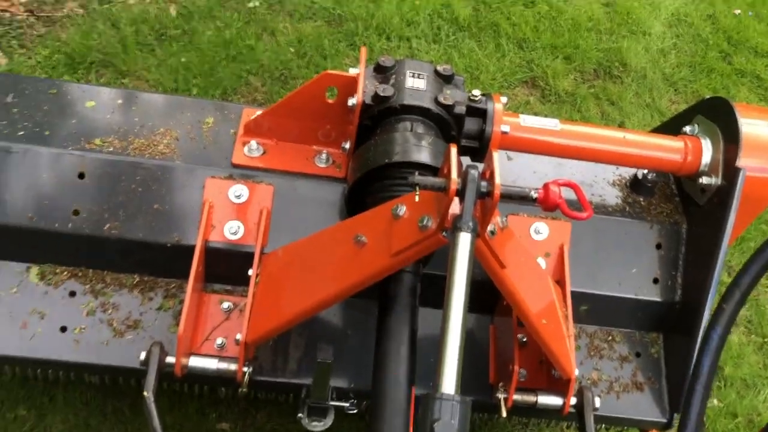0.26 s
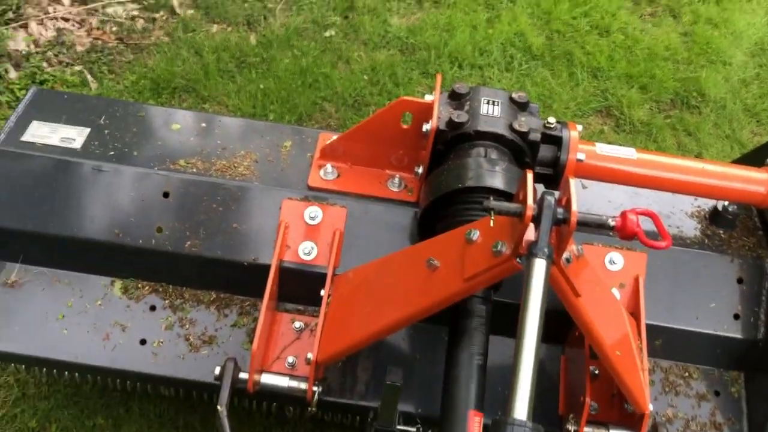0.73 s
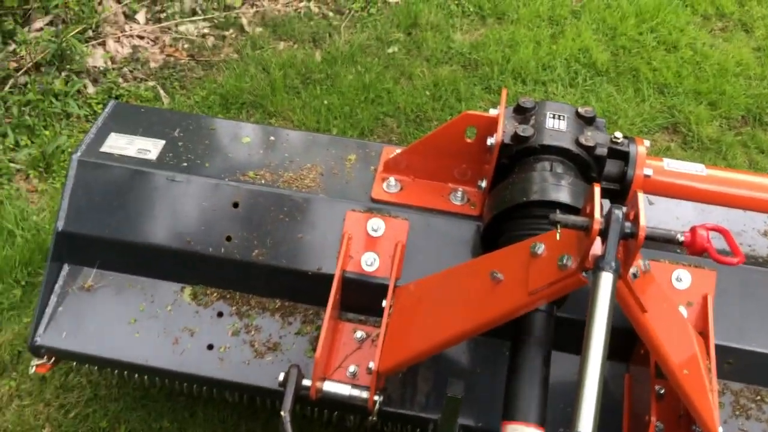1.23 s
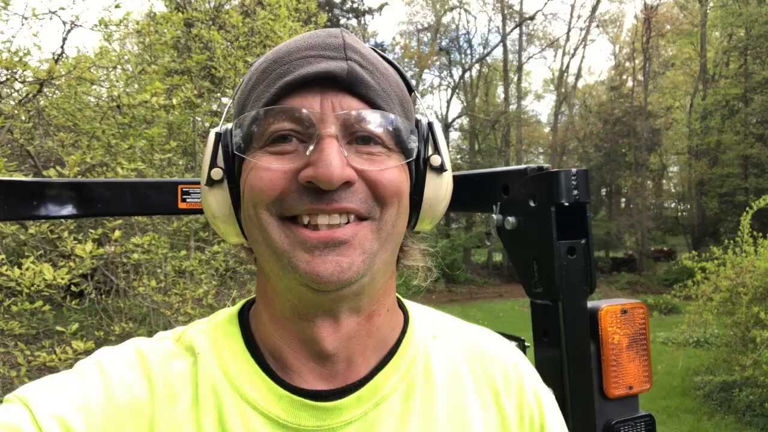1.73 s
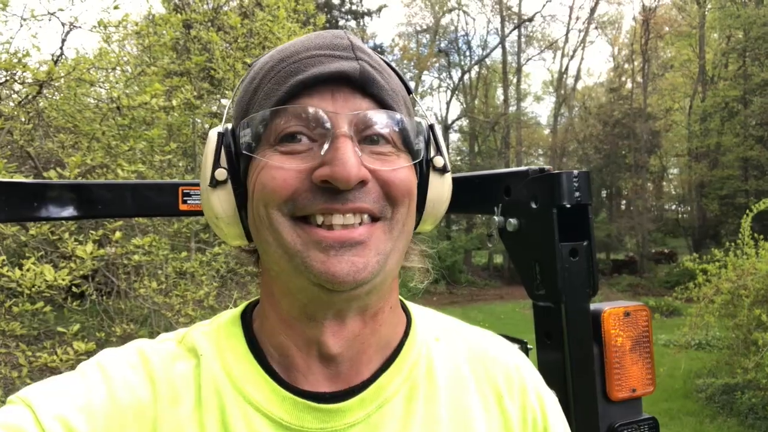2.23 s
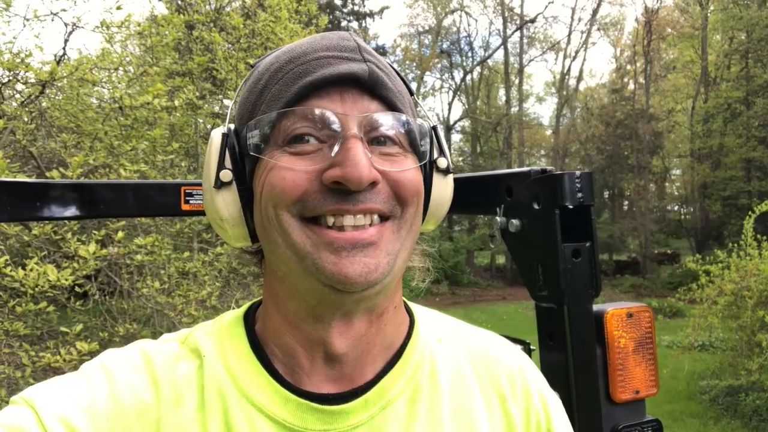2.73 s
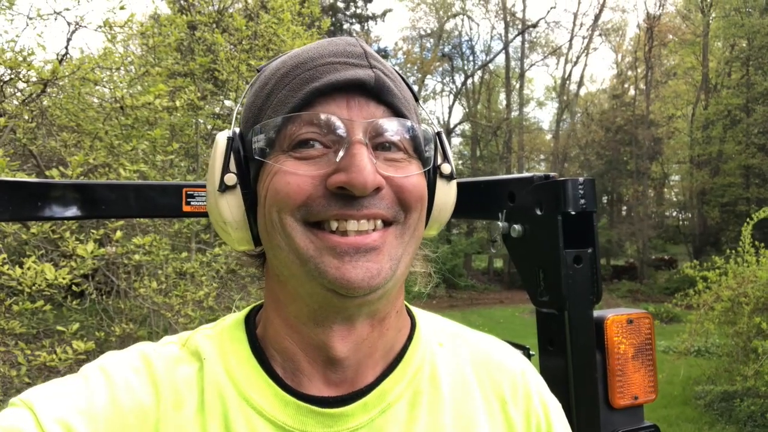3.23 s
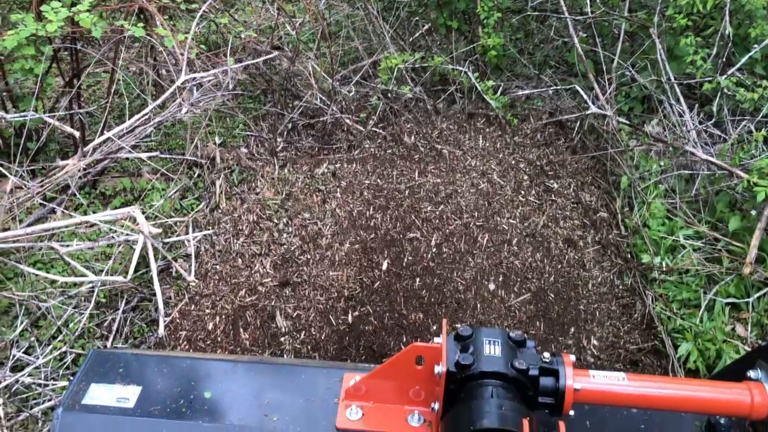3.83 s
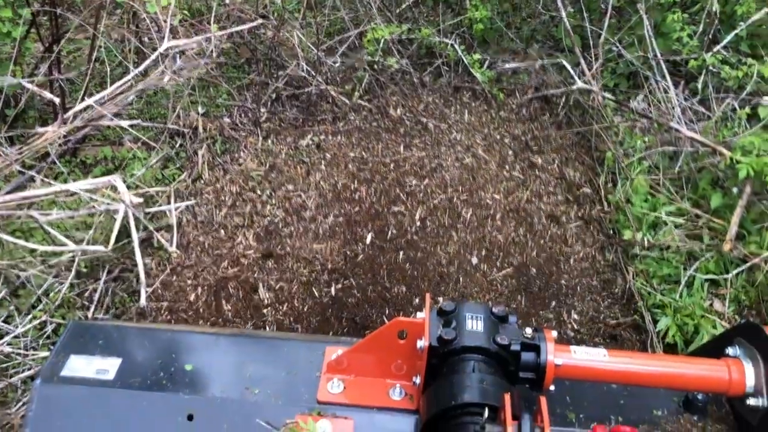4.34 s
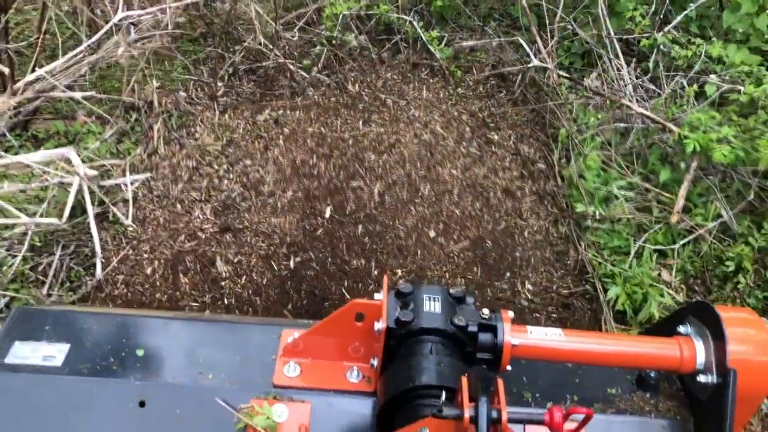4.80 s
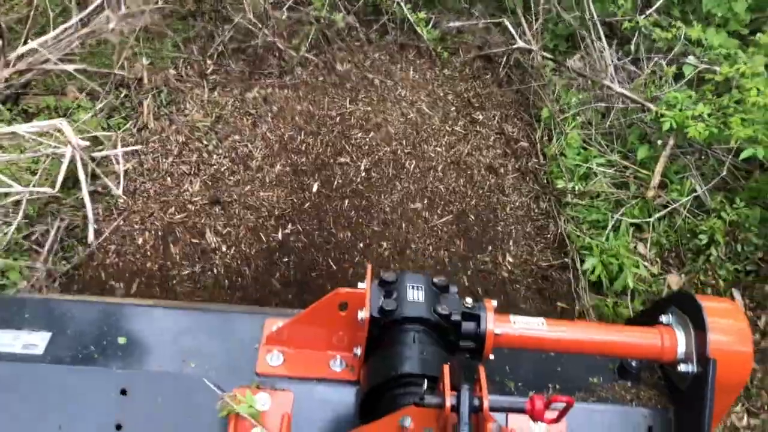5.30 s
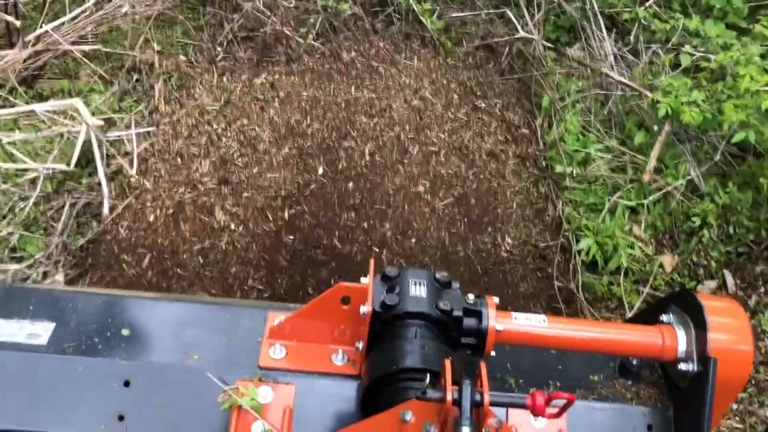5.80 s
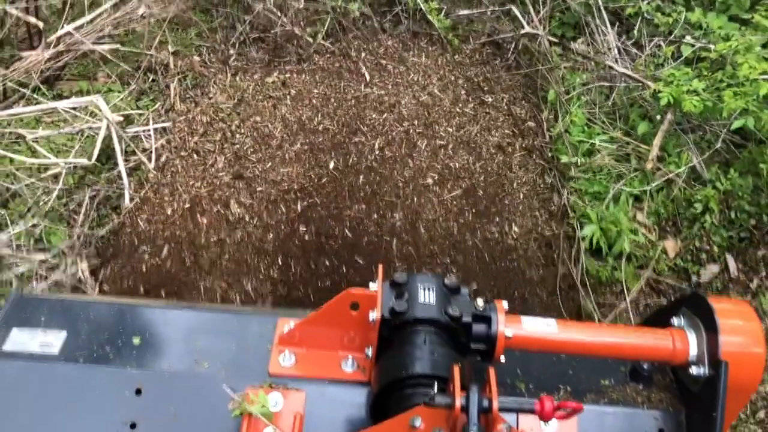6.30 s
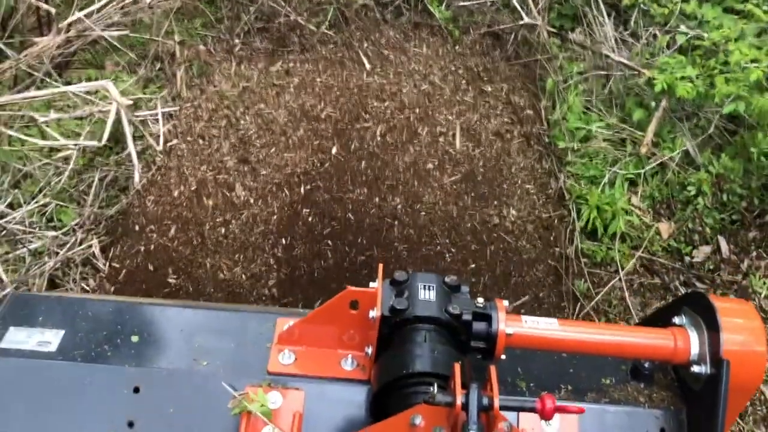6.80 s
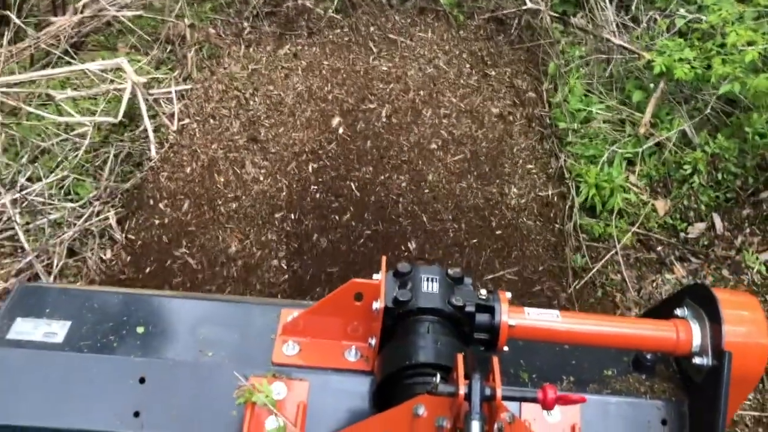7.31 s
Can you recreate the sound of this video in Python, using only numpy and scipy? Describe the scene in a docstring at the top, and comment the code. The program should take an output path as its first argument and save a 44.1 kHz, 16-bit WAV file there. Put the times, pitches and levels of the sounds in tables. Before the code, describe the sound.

A tractor engine drones and a flail mower whirs, then bites into brush with sharp twig cracks and a fizz of debris.

```python
"""A three-cylinder tractor drives a flail mower through a shaft and gearbox; three spots, split by short
gaps. Engine, gears and rotor hum at multiples of the shaft speed over a broad roar. First, over the
gearbox, a loose guard rattles each turn. From 1.8 s, the driver's seat. From 3.6 s, over the deck at
higher speed, stray twigs crack on the flails. The shaft sags, the flails bite into brush at 4.8 s,
and debris cracks and fizzes in the steel hood to the end."""
import sys
import numpy as np
from scipy import signal
from scipy.fft import rfft, irfft, next_fast_len
from scipy.io import wavfile
from scipy.ndimage import uniform_filter1d

SR = 44100
rng = np.random.default_rng(int(sys.argv[2]) if len(sys.argv) > 2 else 0)


def waveform_to_disk(signal):
    """Save audio, clipped to [-1, 1], as 16-bit WAV at the path in sys.argv[1]."""
    frames = np.transpose(np.atleast_2d(signal))
    scaled = np.clip(frames, -1, 1) * 32767
    samples = np.round(scaled).astype(np.int16)
    wavfile.write(sys.argv[1], SR, samples)


N = 332955

CYCLES_PER_TURN = 2.3004  # four-stroke cycles per shaft turn
# multiple of the engine cycle, level/dB per spot
ENGINE_ORDERS_DB = [(3, -55, -59, -70), (6, -60, -58, -52), (7, -69, -63, -48), (9, -45, -48, -53),
                    (11, -58, -53, -50), (12, -46, -45, -57), (13, -52, -56, -66), (17, -52, -64, -58),
                    (20, -48, -52, -50), (23, -68, -63, -53), (24, -55, -61, -51), (30, -49, -54, -56),
                    (38, -52, -67, -60), (41, -59, -69, -59), (44, -49, -63, -62), (46, -62, -66, -60),
                    (47, -60, -62, -53), (52, -58, -71, -56), (54, -52, -64, -63), (60, -56, -57, -68),
                    (91, -56, -60, -68)]
def engine(turns, spot, knock_db):
    """Firing tones, plus knocks that repeat each four-stroke cycle."""
    cycles = CYCLES_PER_TURN * turns
    knock = gain_of(knock_db) * knocks(cycles, spot, ENGINE_ORDERS_DB, rolloff_hz=3300)
    return knock + hum(cycles, ENGINE_ORDERS_DB, rng.random(len(ENGINE_ORDERS_DB)), spot)


TEETH = 36
# mesh, sidebands, two belt-driven parts: multiple of the shaft turn, level/dB per spot
GEAR_ORDERS_DB = [(12.73, -57, -61, -49), (29.2, -43, -47, -44), (36, -45, -49, -59), (40, -50, -66, -75),
                  (45, -50, -57, -75), (68, -61, -53, -70), (71, -49, -46, -75), (72, -45, -59, -60),
                  (73, -54, -56, -75), (74, -50, -59, -75), (75, -46, -49, -73), (77, -56, -57, -75),
                  (78, -49, -52, -75), (81, -51, -58, -80), (105, -52, -68, -63), (112, -51, -61, -78),
                  (144, -47, -66, -65), (147, -53, -68, -75), (150, -47, -62, -68), (162, -50, -68, -75),
                  (174, -52, -62, -80), (177, -47, -58, -64), (178, -48, -63, -65), (180, -42, -55, -61),
                  (181, -48, -59, -62), (182, -51, -70, -64), (183, -53, -61, -70), (216, -47, -80, -80),
                  (217, -50, -80, -79)]
# sideband clusters: multiple of the shaft turn, lift/dB per spot
SIDEBANDS_DB = [(218.5, 2, 13, 14), (255.5, 11, 9, 16), (285, 11, 4, 17), (323, 10, 8, 16),
                (363, 12, 13, 12), (393, 3, 5, 17), (430, 5, 6, 15)]
# loudest point of the low mesh tones: angle/turns per spot
THROB_TURNS = (.98, .24, .5)
def gears(turns, spot, knock_db, tone_gain):
    """Tooth mesh with sidebands: low tones throb once a turn, high ones waver in pitch."""
    knock = gain_of(knock_db) * knocks(turns, spot, GEAR_ORDERS_DB, rolloff_hz=4900, lifts=SIDEBANDS_DB)
    order = np.array([row[0] for row in GEAR_ORDERS_DB])
    mesh = np.round(order / TEETH).astype(int)
    side = order - TEETH * mesh
    phases = rng.random(mesh.max() + 1)[mesh] - side * THROB_TURNS[spot]
    phases -= (mesh > 2) * (side != 0) / 4  # quadrature: AM becomes FM
    phases += .13 * rng.standard_normal(len(order)) * (mesh < 3)
    return knock + tone_gain * hum(turns, GEAR_ORDERS_DB, phases, spot)


def hum(turns, orders, phases, spot):
    """Strong multiples of a turning part, each wavering slowly in level."""
    swell = 1 + .12 * np.array([wander(len(turns), 3.6) for _ in range(4)])
    return np.sqrt(2) * sum(
        gain_of(row[spot + 1]) * swell[k % 4] * np.cos(2 * np.pi * (row[0] * turns + phases[k]))
        for k, row in enumerate(orders))


def knocks(turns, spot, strong, rolloff_hz, lifts=()):
    """One string of knocks comes round every turn, filling in the weaker multiples."""
    order = np.arange(4097)
    hz = order * (turns[-1] - turns[0]) * SR / len(turns)
    weak = ~np.isin(order, [row[0] for row in strong])
    phasors = np.exp(2j * np.pi * rng.random(4097))
    db = roar_db(spot, hz) - 2.7 * (hz / rolloff_hz) ** 2
    db += sum(row[spot + 1] * np.exp(-.5 * ((order - row[0]) / 5.7) ** 2) for row in lifts)
    db += 5.7 * np.clip(rng.standard_normal(4097), -3, 1.5)
    cycle = irfft(weak * phasors * gain_of(db))
    return unit_rms(np.interp(turns % 1 * 8192, np.arange(8192), cycle, period=8192))


# per spot: f/Hz, density/dB
ROAR_SPECTRA_DB = [
    [(21, -47), (35, -11), (79, -14), (117, 3.5), (420, -6.5), (490, -4), (634, -8), (1200, -4.5),
     (2060, -16.5), (3710, -17), (8010, -33), (16000, -38.5)],
    [(21, -53), (35, -22), (114, -6.5), (159, -6), (190, -1.5), (334, -8), (478, -14), (650, -13),
     (1200, -14), (1590, -19.5), (2800, -20.5), (16000, -43.5)],
    [(21, -58), (35, -22.5), (117, -5.5), (155, -4), (210, -6), (309, -9), (466, -18.5), (503, -12),
     (907, -18.5), (1640, -17.5), (1770, -21.5), (16000, -45.5)],
]
# per spot: f/Hz, width/Hz, lift/dB
PANEL_MODES = [
    [(2770, 61, 7), (4850, 52, 5.5), (4880, 90, 1), (6360, 3200, 4), (15100, 1500, 3)],
    [(485, 116, 8.5), (2770, 52, 9.5), (4570, 97, 6.5), (6600, 2100, 4.5), (15400, 200, 12)],
    [(978, 27, 6.5), (3000, 66, 5), (4320, 370, 8), (4750, 100, 8.5), (5350, 50, 10.5), (6280, 80, 8),
     (15400, 200, 9)],
]
def roar_db(spot, hz):
    """Machine spectrum with ringing panels and housings on top."""
    panels = sum(db / (1 + (2 * (hz - f) / width) ** 2) for f, width, db in PANEL_MODES[spot])
    return spectrum_db(ROAR_SPECTRA_DB[spot], hz) + panels


def roar(turns, spot, throb, churn):
    """Air, belts and housings: noise pulsing with each tooth, firing and uneven shaft turn."""
    firing = np.cos(2 * np.pi * 3 * CYCLES_PER_TURN * turns)
    beat = 1 + throb * np.cos(2 * np.pi * TEETH * turns) + .12 * firing
    beat *= 1 + churn * (np.cos(2 * np.pi * (turns - .35)) + 1.4 * np.cos(2 * np.pi * 3 * (turns - .17)))
    beat *= gain_of(.82 * wander(len(turns), 13))
    return unit_rms(shaped(rng.standard_normal(len(turns)) * beat, lambda hz: roar_db(spot, hz)))


# per spot: roar/dB, engine knocks/dB, gear knocks/dB, tooth throb depth, shaft churn depth
SPOT_MIX = [(-35, -35.5, -36.5, 0.04, 0.09), (-41, -44, -44, 0.06, 0), (-39, -41, -43.5, 0.09, 0.04)]
def drivetrain(turns, spot, effort_gain):
    """Roar, engine and gears at one spot; the guard carries only to the first."""
    noise_db, engine_db, gear_db, throb, churn = SPOT_MIX[spot]
    out = gain_of(noise_db) * roar(turns, spot, throb, churn)
    out += effort_gain * engine(turns, spot, engine_db)
    out += gears(turns, spot, gear_db, effort_gain)
    return out + guard_rattle(turns) * (spot == 0)


SHAFT_HZ, CREEP_HZ_PER_S, SAG_HZ = (6.7393, 6.7393, 9.105), .012, .075
SAG_START_S, SAG_RAMP_S = 4.55, .68
def shaft_hz():
    """Shaft speed creeps down while mowing and sags as the flails load up."""
    mowing_s = np.maximum(np.arange(N) / SR - SPOTS_S[2][0], 0)
    return per_spot(SHAFT_HZ) - CREEP_HZ_PER_S * mowing_s - SAG_HZ * ramp(SAG_START_S, SAG_RAMP_S)


ROWS_PER_TURN, BELT_SLIP_ROWS = 17.02, .07
# running free, per spot: tone/dB, octave/dB
ROTOR_FREE_DB = [(-41.5, -77), (-44, -51), (-39, -48)]
# cutting: t/s, relative load/dB, rotor octave/dB
FLAIL_LOAD_DB = [(4.85, -2, -40.5), (5.25, 11.5, -39), (5.41, 10.5, -37), (5.5, 3, -49), (5.59, 5, -40),
                 (5.88, 5, -44), (6.3, 4, -38.5), (6.5, 5, -39), (6.75, 11, -38), (7.2, 10, -39),
                 (7.55, -1, -35.5)]
def rotor():
    """Pressure pulses of flail rows passing the hood: a tone and its octave."""
    free_db, free_octave_db = per_spot(ROTOR_FREE_DB).T
    load_db, cutting_octave_db = curves(FLAIL_LOAD_DB)
    tone_db = bite(free_db, -36.5 + .71 * load_db) + .7 * wander(N, 10)
    octave_db = bite(free_octave_db, cutting_octave_db) + .9 * wander(N, 15)
    rows = ROWS_PER_TURN - BELT_SLIP_ROWS * ramp(SAG_START_S, SAG_RAMP_S)
    phase = 2 * np.pi * np.cumsum(rows * shaft_hz()) / SR
    octave = gain_of(octave_db) * np.cos(2 * phase - np.pi / 4)
    return np.sqrt(2) * (gain_of(tone_db) * np.cos(phase) + octave)


def bite(free_db, cutting_db):
    """The flails meet the brush: level moves from free running to cutting."""
    cutting = ramp(start_s=4.815, length_s=.038)
    return (1 - cutting) * free_db + cutting * cutting_db


SNAP_HZ, SNAP_DB, SNAP_T60_S = 6000, -7, .028
# t/s, level/dB, f/Hz
TWIG_CRACKS = [(3.7146, -43, 5500), (4.0025, -42, 6100), (4.295, -40, 6950), (4.5881, -42, 10000),
               (4.824, -38, 4400), (5.2531, -39, 10000), (5.277, -34, 2020), (5.4328, -37.5, 2670),
               (5.511, -30.5, 1930), (5.523, -33, 3000), (5.5875, -38, 4360), (5.609, -35, 2030),
               (5.723, -37, 2600), (5.7495, -41, 11000), (5.819, -34, 4400), (5.911, -34, 2010),
               (5.977, -26, 2490), (5.9947, -40, 7000), (6.0791, -39, 3610), (6.143, -42, 4400),
               (6.2581, -34, 2900), (6.475, -40, 1570), (6.629, -49, 8000), (6.719, -36, 3500),
               (6.8034, -33, 4000), (6.8273, -34, 3000), (6.852, -39, 3900), (7.0575, -38, 7000),
               (7.09, -38, 3920), (7.123, -31, 3500), (7.136, -39, 4300), (7.2127, -48, 7500),
               (7.227, -37, 7000), (7.356, -42, 4400), (7.4725, -40, 3850)]
# f/Hz, level/dB, t60/s
HOOD_MODES = [(1570, -2, .03), (1990, 2, 0.045), (2563, 1, 0.035), (3310, -3, 0.02), (3670, -2, 0.04),
              (4400, 1, 0.045), (5050, -7, 0.03), (5940, -5, .02), (7450, -11, .02)]
def twig_cracks():
    """Twigs break on the flails: splintering burst, bright snap, ring of the nearest hood modes."""
    out, t = np.zeros(N + 6000), np.arange(6000) / SR
    envelope = (gain_of(-60 * t / .077) + .52 * gain_of(-60 * t / .36)) * np.minimum(t / .0013, 1)
    for start_s, db, pitch_hz in TWIG_CRACKS:
        near_db = lambda hz: -6 * (np.log2(hz / pitch_hz + .01) / 1.1) ** 2
        burst = noise(len(t), near_db) * envelope
        snap = noise(len(t), lambda hz: -12 * np.abs(np.log2(hz / SNAP_HZ + .011)))
        snap *= gain_of(SNAP_DB - 60 * t / SNAP_T60_S)
        ring = np.zeros(len(t))
        for f, mode_db, t60 in HOOD_MODES:
            struck_db = mode_db + 3 * rng.standard_normal() + 1.5 * near_db(f)
            struck_hz = f * (1 + .048 * rng.standard_normal())
            ring += gain_of(struck_db - 60 * t / t60) * np.sin(2 * np.pi * struck_hz * t)
        out[round(start_s * SR):][:len(t)] += gain_of(db) * (.3 * burst + .45 * ring + snap)
    return out[:N]


BITS_PER_S, SURGE_DB, SURGE_HZ = 250, 2.8, 9
# f/Hz, level/dB
CHAFF_SPECTRUM_DB = [(300, -23), (800, -3), (1600, -11), (2500, 2.5), (4500, -1.5), (7000, -3.5),
                     (11000, -9), (16000, -13.5)]
def chaff():
    """Bits of unequal size pepper the hood; four bands each surge on their own."""
    def hood_db(hz):
        modes = sum(5.9 / (1 + (2 * (hz - f) * t60 / .86) ** 2) for f, _, t60 in HOOD_MODES)
        return spectrum_db(CHAFF_SPECTRUM_DB, hz) + modes

    sizes = gain_of(5.1 * np.minimum(rng.exponential(1, (5, N)), 4))
    hits = sizes * (rng.random((5, N)) < BITS_PER_S / SR)
    shared, *puffs = signal.oaconvolve(hits, np.exp(-np.arange(900) / SR / .0016)[None])[:, :N]
    fizz = np.zeros(N)
    for puff, band_hz in zip(puffs, (800, 2500, 6000, 13000)):
        grains = rng.standard_normal(N) * (2.5 + unit_rms(.1 * shared + puff))
        grains *= gain_of(SURGE_DB * wander(N, SURGE_HZ))
        fizz += shaped(grains, lambda hz: hood_db(hz) - 6 * np.log2(hz / band_hz + .01) ** 2)
    treble_rms = np.std(shaped(fizz, lambda hz: -100 * (hz < 5000)))
    return chaff_flow() * fizz / treble_rms


SHOWER_DB, SHOWER_RISE_T60_S, SHOWER_FALL_T60_S = -16, .04, .12
def chaff_flow():
    """Chaff amplitude above 5 kHz: stray bits, then the cutting feed, plus a shower at each crack."""
    t = np.arange(N) / SR
    mowing_s = t - SPOTS_S[2][0]
    load_db, _ = curves(FLAIL_LOAD_DB)
    power = gain_of(2 * bite(free_db=-65 + 6 * mowing_s, cutting_db=-52 + .23 * load_db))
    for crack_s, db, _ in TWIG_CRACKS:
        drop_db = 60 * np.maximum((t - crack_s) / SHOWER_FALL_T60_S, (crack_s - t) / SHOWER_RISE_T60_S)
        power += gain_of(2 * (db + SHOWER_DB - drop_db))
    return np.sqrt(power) * (mowing_s > 0)


SQUEAK_HZ, WOBBLE_HZ, SQUEAK_PEAK_DB = 3625, 60, 2.5
# angle/turns, width/turns, level/dB
RATTLE_BURSTS = [(.15, 0.037, -36), (.31, 0.1, -39.5), (.765, 0.048, -37), (.95, 0.02, -44.5)]
# f/Hz, nominal width/Hz, level/dB
GUARD_MODES = [(2900, 130, -1), (3630, 180, -1), (3920, 100, 1), (4210, 190, 0), (4700, 350, -7.5)]
def guard_rattle(turns):
    """Gear teeth tap a loose guard at the same angles each turn, with chatter and a squeak."""
    def ring_db(hz):
        power = sum(gain_of(2 * db) / (1 + (2 * (hz - f) / w) ** 2) ** 1.9 for f, w, db in GUARD_MODES)
        return 10 * np.log10(power)

    bursts = sum(gain_of(db) * np.exp(-.5 * (((turns - angle + .5) % 1 - .5) / width) ** 2)
                 for angle, width, db in RATTLE_BURSTS)
    taps = np.diff(np.floor(TEETH * turns), prepend=0) * rng.uniform(.5, 1.5, len(turns))
    chatter = 1.07 * rng.standard_normal(len(turns))
    ring = unit_rms(shaped(unit_rms(taps) + chatter, ring_db))
    squeak = np.cos(2 * np.pi * np.cumsum(SQUEAK_HZ + WOBBLE_HZ * wander(len(turns), 93)) / SR)
    return bursts * unit_rms(ring + gain_of(SQUEAK_PEAK_DB) * squeak)


# per spot: start/s, peak/s, end/s, f/Hz, width/Hz, level/dB
WHISTLE_SWELLS = [(1.0, 1.5, 2.6, 10700, 150, -71), (.2, 3.4, 5.5, 10640, 300, -69.5),
                  (3.3, 3.8, 4.7, 11450, 200, -70.5)]
def whistle():
    """Thin narrow-band hiss, one swell per spot."""
    t, out = np.arange(N) / SR, np.zeros(N)
    for spot, (start, peak, end, f, width, db) in enumerate(WHISTLE_SWELLS):
        band = noise(N, lambda hz: np.maximum(-6 * (2 * (hz - f) / width) ** 2, -100))
        swell = np.interp(t, (start, peak, end), (0, 1, 0))
        out += gain_of(db) * swell * band * (per_spot((0, 1, 2)) == spot)
    return out


def gain_of(db):
    return 10 ** (np.asarray(db) / 20)


def unit_rms(x):
    return x / np.sqrt(np.mean(x ** 2) + 1e-20)


def spectrum_db(points, hz):
    """Interpolates on a log-frequency axis."""
    f, db = np.transpose(points)
    return np.interp(np.log(hz + 1), np.log(f + 1), db)


def curves(rows):
    """Columns of a time table, per sample."""
    times_s, *columns = np.transpose(rows)
    return [np.interp(np.arange(N) / SR, times_s, column) for column in columns]


def shaped(x, db_at_hz):
    size = next_fast_len(len(x))
    return irfft(rfft(x, size) * gain_of(db_at_hz(np.fft.rfftfreq(size, 1 / SR))), size)[:len(x)]


def noise(size, db_at_hz):
    return unit_rms(shaped(rng.standard_normal(size), db_at_hz))


def wander(size, hz):
    """Slow random drift, rms 1."""
    smooth = uniform_filter1d(rng.standard_normal(size), 200)
    return unit_rms(signal.lfilter([1], [1, -np.exp(-2 * np.pi * hz / SR)], smooth))


def ramp(start_s, length_s):
    return np.clip((np.arange(N) / SR - start_s) / length_s, 0, 1)


def per_spot(values):
    """Holds each value until its spot ends."""
    return np.asarray(values)[np.searchsorted([end for _, end, _ in SPOTS_S], np.arange(N) / SR)]


COASTING_DB = -1.5  # engine and gear tones at the deck, before the sag
# gearbox, seat, deck: start/s, end/s, fade-in/s
SPOTS_S = [(-.01, 1.7955, 0.0023), (1.812, 3.5335, 0.017), (3.581, 7.6, 0.0068)]
def scene():
    """Mower and drivetrain from each spot in turn."""
    t, turns = np.arange(N) / SR, np.cumsum(shaft_hz()) / SR
    effort_gain = gain_of(per_spot((0, 0, COASTING_DB)) * (1 - ramp(SAG_START_S, SAG_RAMP_S)))
    out = rotor() + chaff() + twig_cracks() + whistle()
    for spot, (start, end, _) in enumerate(SPOTS_S):
        part = (t >= start) & (t < end)
        out[part] += drivetrain(turns[part], spot, effort_gain[part])
    return out[None]


LOW_CUT_HZ, HIGH_CUT_HZ = 36, 15750
def record(dry):
    """Bass roll-off, gaps between spots, faint dull noise floor, band limit."""
    t = np.arange(N) / SR
    thinned = signal.sosfilt(signal.butter(4, LOW_CUT_HZ, "high", fs=SR, output="sos"), dry)
    gate = sum(np.clip((t - start) / fade, 0, 1) ** 2 * np.clip((end - t) / .00051, 0, 1)
               for start, end, fade in SPOTS_S)
    floor = gain_of(-69) * noise(N, lambda hz: -12 * (hz / 1000) ** 2)
    lowpass = signal.firwin(511, HIGH_CUT_HZ, window=("kaiser", 9), fs=SR)
    return signal.oaconvolve(thinned * gate + floor, lowpass[None], "same")


dry = scene()
out = record(dry)
waveform_to_disk(out)
```